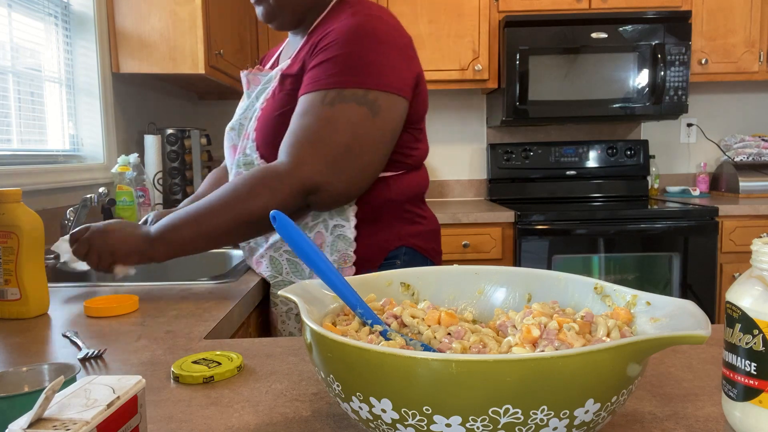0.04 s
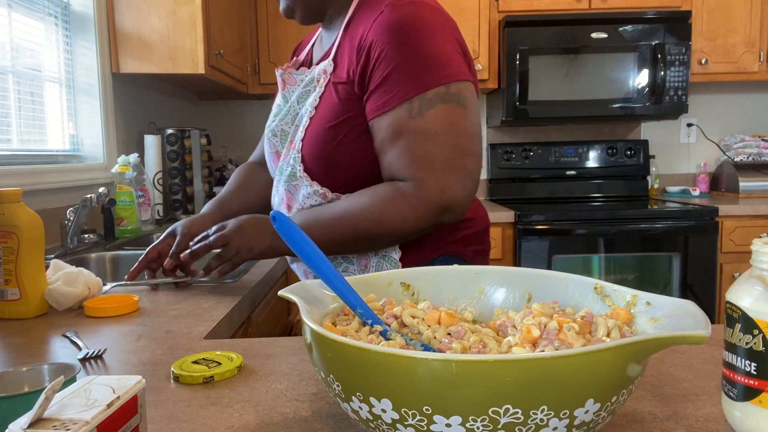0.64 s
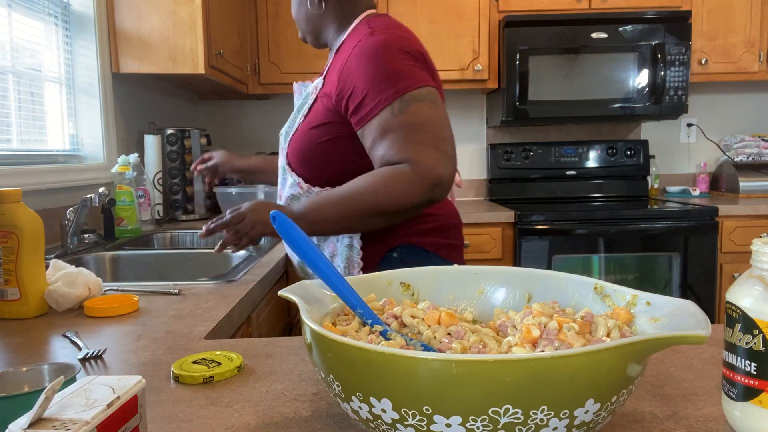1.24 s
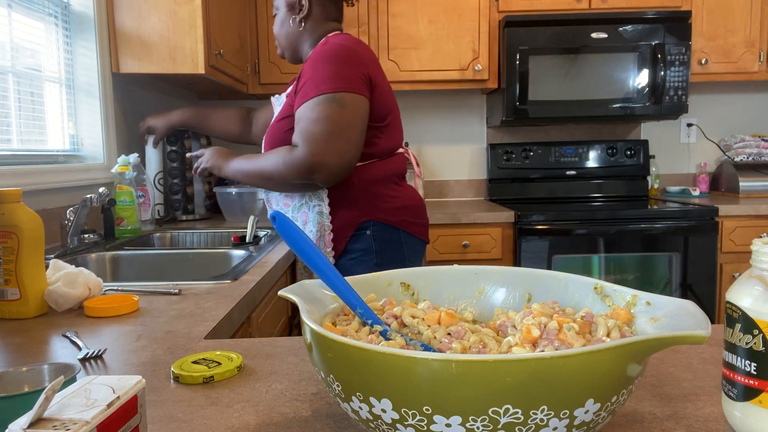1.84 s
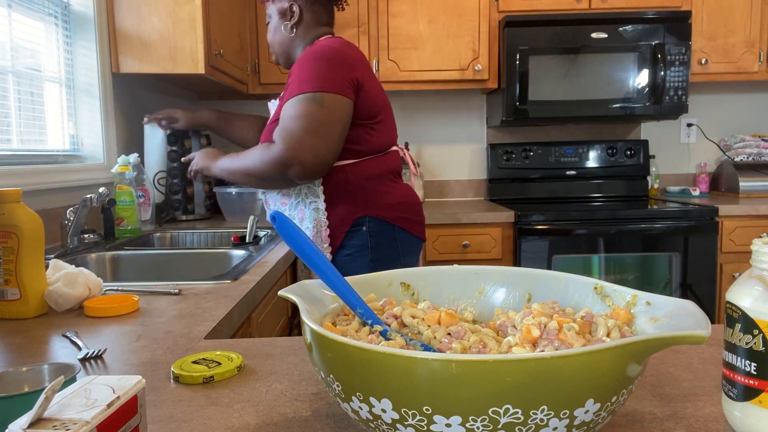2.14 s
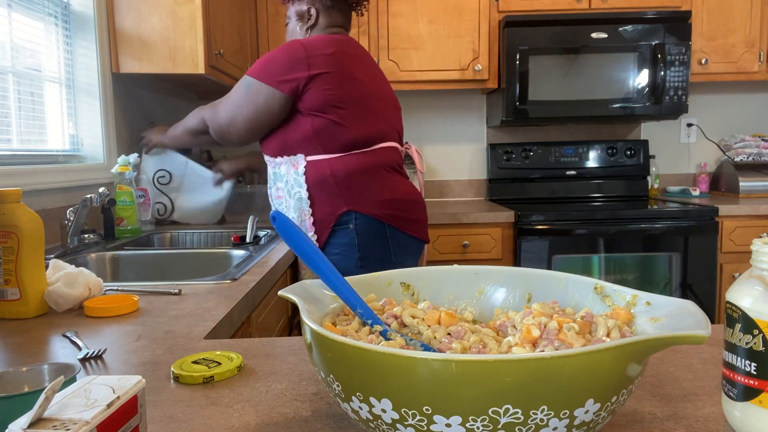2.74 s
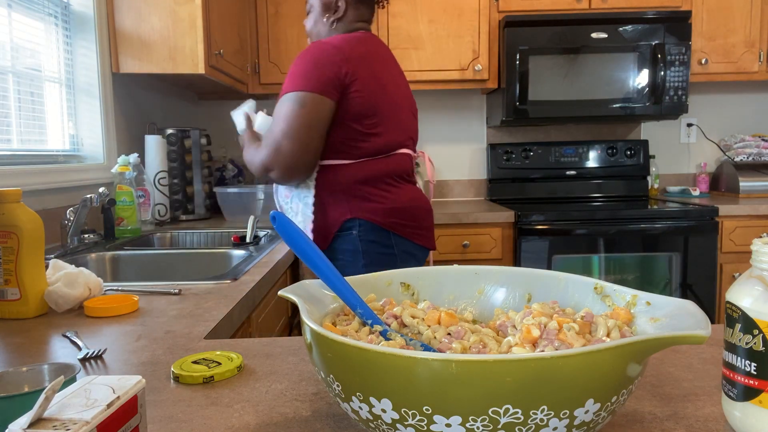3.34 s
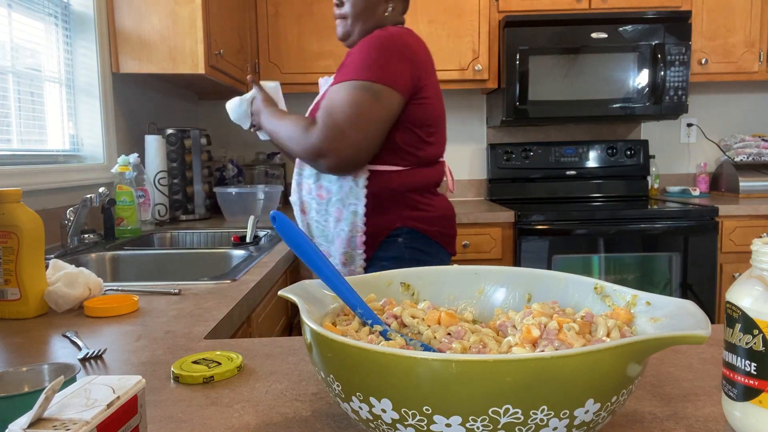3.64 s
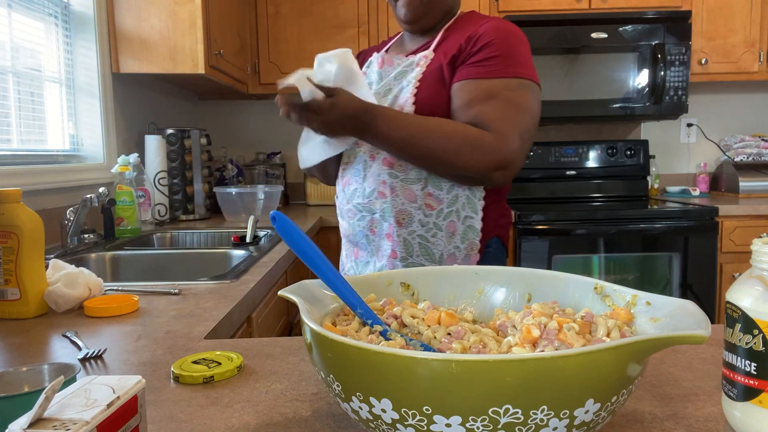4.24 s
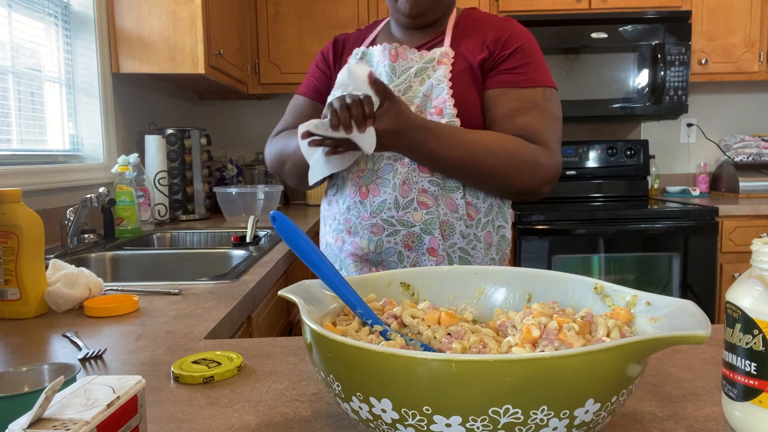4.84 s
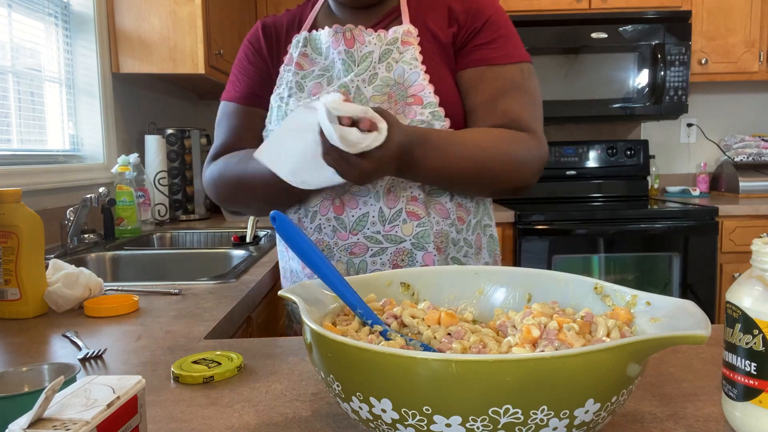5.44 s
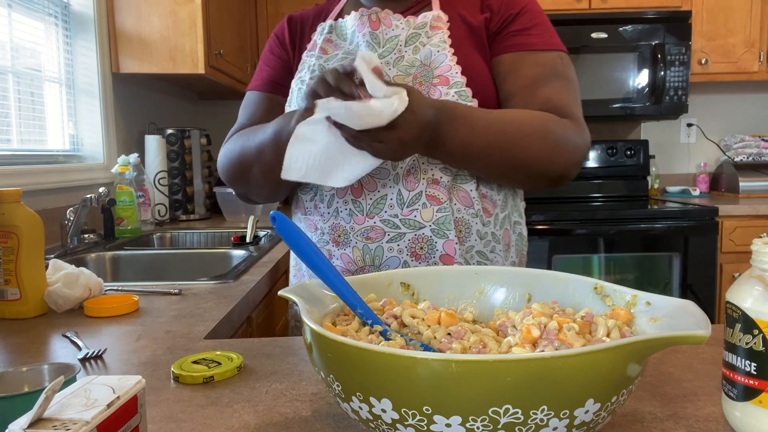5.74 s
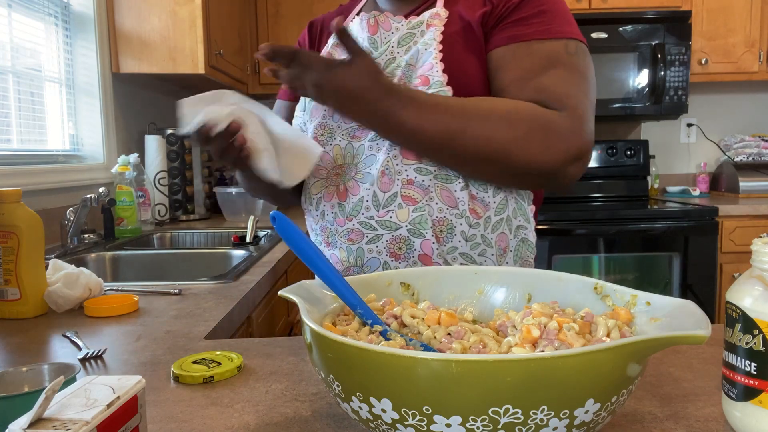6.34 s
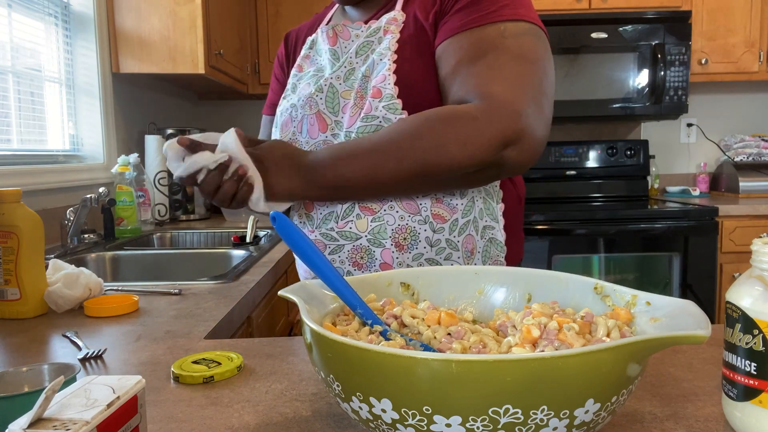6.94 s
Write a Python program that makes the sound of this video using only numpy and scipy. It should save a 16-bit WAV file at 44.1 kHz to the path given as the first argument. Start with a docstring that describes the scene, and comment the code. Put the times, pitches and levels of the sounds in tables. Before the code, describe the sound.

Two ringing knocks in a kitchen sink, followed by a paper towel roll rumbling, a quick rip and soft hand drying.

```python
"""A dull knock and a ringing clatter, just after a faint rustle of wet hands: a metal utensil is laid
down at a steel sink, thudding into the basin and ringing in its own modes. A paper towel roll rumbles
and hoots on its holder, the perforations of a sheet snap and the roll thumps back. Wet hands rub and
pat the sheet, making its fibres crackle. The kitchen is small and hard, with a low steady throb."""
import sys
import numpy as np
from scipy import signal
from scipy.fft import rfft, irfft, next_fast_len
from scipy.io import wavfile
from scipy.ndimage import uniform_filter1d, map_coordinates

SR = 44100
rng = np.random.default_rng(int(sys.argv[2]) if len(sys.argv) > 2 else 0)


def transcribe(u):
    """Save the signal u as a 16-bit wav file named by the first command-line argument.

    u: samples, shape (n,) or (channels, n), limited to [-1, 1]; the rate is SR.
    q: integer samples, one column per channel.
    """
    v = np.clip(np.atleast_2d(u).T, -1, 1)
    q = np.round(v * 32767).astype(np.int16)
    wavfile.write(sys.argv[1], SR, q)


N = 317895
TIME = np.arange(N) / SR

# utensil hits on the sink: t/s, thud/dB, contact brightness/Hz, clash/dB, ring/dB, tilt/(dB per octave)
SINK_HITS = [(0.4781, 5, 2450, -35, -63.5, 5), (0.4852, -17.5, 1440, -56.5, -64, -1),
             (0.4889, -11, 2170, -55.5, -71, 4), (0.5238, -17, 1900, -42.5, -64, 5),
             (0.7311, -8, 3800, -26, -38, -12), (0.7336, 2.5, 1490, -36, -46, 4),
             (0.7513, -4.5, 3200, -32.5, -40, 5.5), (0.7538, -2.5, 1480, -57, -53, -0.5),
             (0.777, -19, 3000, -36, -36, -5), (0.7965, -8.5, 2500, -35.5, -51, -5),
             (0.825, -14, 3000, -35.5, -38.5, -4)]
# EQ of the basin's thud and of the steel-on-steel clash: f/Hz, level/dB
THUD_EQ = [(40, -29.5), (70, -6), (120, -9), (250, -7.5), (430, 3), (800, -0.5), (1200, -1.5), (2000, -8.5),
           (3000, -30), (5000, -29), (15000, -17.5)]
CLASH_EQ = [(500, 0.5), (1500, 10), (2500, 6.5), (3400, 0), (4300, -2.5), (5700, -8.5), (7500, -17.5),
            (10000, -28.5), (12500, -52.5), (15500, -62.5)]
# resonances of the basin and of the utensil: f/Hz, level/dB, t60/s
BASIN_RING = [(68, -10.5, 0.68), (203.4, -4, 0.27), (262, -5.5, 0.43), (415, -1.5, 0.16), (669, -12, 0.11),
              (785, 2.5, 0.229), (1000, -18.5, 0.2), (1143, -6, 0.19), (1450, -17, 0.26),
              (1830, -13, 0.1426)]
UTENSIL_RING = [(2993, -16, .38), (3323, -11, .4), (4510, -13.5, .43), (4798, -1.5, .33), (6344, -11, .39),
                (7283, -19.5, .41), (9103, -29, .43), (9435, -21, .41), (10760, -18, .28),
                (12190, -32.5, .32), (13790, -41, .35), (15650, -51, .25)]

def sink():
    """Each hit thuds into the damped basin, scrapes steel on steel and sets the utensil ringing."""
    s, thud_db, bright_hz, clash_db, ring_db, tilt_db = np.transpose(SINK_HITS)
    thuds = np.zeros(N)
    for at, db, hz in zip(s, thud_db, bright_hz):
        add(thuds, at, amp(db) * pulse(THUD_EQ, hz, slope=7.7))
    # the steel sheet's many short modes thicken the thud
    body = scatter(thuds, [(200, 0.062), (4000, 0.024)], wet_db=-5.5, rise_s=0.00077)
    contact = sum(burst(at, db, dying_s=0.0097) for at, db in zip(s, clash_db))
    clash = contact * colour(rng.standard_normal(N), CLASH_EQ)
    basin = amp(-38.5) * ring(BASIN_RING, np.c_[s, thud_db, np.zeros_like(s)], waver=0.44)
    utensil = ring(UTENSIL_RING, np.c_[s, ring_db, tilt_db], waver=0.33)
    impact = room(body, wet_db=-2) + room(clash, wet_db=0)
    return impact + room(basin, wet_db=-6) + room(utensil, wet_db=-8)


# knocks of the roll on its holder: t/s, level/dB, contact brightness/Hz, holder ring/dB
ROLL_KNOCKS = [(2.1513, -22.5, 3800, -51), (2.176, -25, 1800, -46), (2.199, -15, 1410, -48),
               (2.238, -18.5, 900, -65), (2.380, -25, 900, -56), (2.992, -24, 1400, -36.5),
               (3.003, -16.5, 1200, -34.5), (3.031, -16, 900, -57), (3.049, -25, 1094, -51),
               (3.081, -14, 786, -51), (3.116, -28, 920, -45.5)]
# tugs that spin the roll: peak t/s, length/s, rumble/dB
ROLL_TUGS = [(1.899, 0.077, -58), (2.175, 0.094, -45), (2.392, 0.092, -56.5), (2.534, 0.081, -53),
             (2.672, 0.11, -57.5), (2.794, 0.097, -48), (3.009, 0.084, -41)]
# EQ of the hollow roll: f/Hz, level/dB
ROLL_EQ = [(60, -9), (105, -10), (150, -4), (210, 1), (280, -2), (380, -1), (480, -7), (720, -6),
           (1100, -15), (1700, -23), (4000, -45), (8000, -68)]
# resonances of the holder: f/Hz, level/dB, t60/s
HOLDER_RING = [(210, -6, 0.2), (596, -13, .12), (730, 2, 0.063), (1147, -10, 0.044)]

def roll():
    """The cardboard core rumbles round its post at each tug, and knocks against the holder."""
    knocks = np.zeros(N)
    for s, db, bright_hz, _ in ROLL_KNOCKS:
        add(knocks, s, amp(db) * pulse(ROLL_EQ, bright_hz, slope=3))
    holder = ring(HOLDER_RING, [(s, ring_db, 0) for s, _, _, ring_db in ROLL_KNOCKS], waver=0.23)
    # the roll speeds up quickly, then coasts
    spin = sum(amp(db) * swell(s, length_s, rise=0.22) for s, length_s, db in ROLL_TUGS)
    soft_contact = signal.butter(1, 1100, fs=SR)
    bumps = signal.lfilter(*soft_contact, grains(per_s=600, spread_db=0.5))
    rumble = spin * colour(bumps, ROLL_EQ)
    return room(knocks + rumble, wet_db=-0.5) + room(holder, wet_db=-19)


# slips of the core on its post: peak t/s, length/s, level/dB, f/Hz
CORE_SLIPS = [(2.391, .03, -47, 579), (2.853, .02, -37.5, 505), (2.877, .015, -30.5, 540),
              (2.925, .024, -41.5, 535)]

def judder(glide_hz_per_s=500):
    """The core sticks and slips on its post; each slip is a short, rough, rising hoot."""
    hoots = np.zeros(N)
    roughness = 1 + 0.0247 * drift(rate=280)
    for s, length_s, db, hz in CORE_SLIPS:
        pitch = hz + glide_hz_per_s * np.clip(TIME - s, -length_s, length_s)
        phase = 2 * np.pi * np.cumsum(pitch * roughness) / SR
        tone = np.sin(phase) + amp(-18.5) * np.sin(2 * phase)
        hoots += amp(db) * swell(s, length_s, rise=0.78) * tone
    return room(hoots, wet_db=-7)


# EQ of the rip: f/Hz, level/dB
TEAR_EQ = [(60, 5), (150, -7), (274, -1.5), (370, -17), (600, -0.5), (1100, -4), (1800, -6), (2300, -13),
           (3500, -16), (4900, -17.5), (8000, -27.5), (13000, -37), (15500, -47)]

def tear(start_s=2.781, length_s=0.093, attack_s=0.0045, release_s=0.018, sag_db_per_s=38):
    """Perforations snap in a quick run; the rip weakens as it goes, then lets go."""
    t = np.maximum(TIME - start_s, 0)
    attack = np.minimum(t / attack_s, 1)
    release = np.exp(-np.clip((t - length_s) / release_s, 0, 20))
    pull = attack * amp(-46 - sag_db_per_s * t) * release
    perforations = grains(per_s=2200, spread_db=3.3)
    return room(pull * colour(perforations, TEAR_EQ), wet_db=-0.5)


# pats and snaps of the sheet in the hands: t/s, level/dB, snap relative to level/dB, decay/s
HAND_PATS = [(2.323, -59.5, -3, 0.011), (2.371, -60.5, -1, 0.0086), (2.7841, -39.5, -3, 0.0012),
             (2.79, -39, -11, 0.0093), (3.073, -63, 1, 0.0053), (3.273, -57.5, -20, 0.0055),
             (3.305, -56.5, -6, 0.0066), (5.049, -61.5, -5.5, 0.0063), (5.3357, -54, -10.5, 0.0039),
             (5.875, -54, -13, 0.0072), (5.88, -49.5, -5, 0.0095), (6.436, -42.5, -18, 0.0031),
             (6.4382, -38.5, -4, 0.0026), (6.441, -48, -6.5, 0.0061)]
# EQ of the palm and of the snapping folds: f/Hz, level/dB
PALM_EQ = [(100, -12), (220, -2), (420, 1), (580, 5), (800, 0), (1450, -1), (2200, -8), (4000, -24),
           (9000, -45)]
SNAP_EQ = [(800, -15), (2100, 0), (3200, 3), (4900, -2), (8000, -7), (11000, -18), (15500, -27)]

def pats(slap_s=6.4383):
    """The palm gives a dull puff and the folds snap under it."""
    palm = sum(burst(s, db, dying_s) for s, db, _, dying_s in HAND_PATS)
    folds = sum(burst(s, db + snap_db, dying_s) for s, db, snap_db, dying_s in HAND_PATS)
    puff = palm * colour(rng.standard_normal(N), PALM_EQ)
    # the hardest pat lands flat and pushes the air out at once
    add(puff, slap_s, amp(-19) * pulse(PALM_EQ, bright_hz=3000, slope=1))
    snap = folds * colour(rng.standard_normal(N), SNAP_EQ)
    return room(puff, wet_db=-6.5) + room(snap, wet_db=-2.5)


# wet hands move, reach for the roll, unroll it, gather the sheet and dry themselves:
# peak t/s, length/s, rustle/dB, crinkle relative to rustle/dB, rub relative to rustle/dB
HAND_STROKES = [(0.075, 0.25, -74, -6.5, 5.5), (0.245, 0.078, -79.5, -8, 6), (1.235, .12, -91, -8, 19),
                (1.594, 0.27, -75, -5, 6), (1.843, 0.38, -75.5, -9, 0), (2.087, 0.096, -78.5, 0, 10),
                (2.169, 0.044, -75, -16, 21.5), (2.24, 0.14, -72, -4, -1), (2.352, 0.16, -71.5, -10, 4.5),
                (2.514, 0.13, -74, -8, 1), (2.754, 0.28, -70, -8, 5), (3.314, 0.17, -72, -10, 7),
                (3.474, 0.17, -72, -8, 5), (3.646, 0.2, -76, -4.5, -1.5), (3.873, 0.16, -77, -7, 3),
                (4.03, 0.063, -81, -11, 5.5), (4.16, 0.38, -81.5, -11.5, 8.5),
                (4.556, 0.19, -76.5, -11, 6.5), (4.805, 0.25, -75.5, -6.5, 2), (5.047, 0.089, -75, -9, -2),
                (5.151, 0.09, -73.5, -6, -2), (5.252, 0.17, -76, -12, 5.5), (5.476, 0.16, -70.5, -8, -6),
                (5.717, 0.17, -75.5, -7, 3.5), (5.989, 0.17, -73, -11, 2), (6.193, 0.13, -72.5, -4, -2),
                (6.829, 0.17, -70, -7.5, 0), (6.996, 0.15, -79, -4, 1.5), (7.19, .08, -76, -1.5, -3)]
# EQ of the paper's rustle, its crisp creases and the rubbing skin: f/Hz, level/dB
RUSTLE_EQ = [(700, -20.5), (1600, 0.5), (2600, 1), (3500, -0.5), (4900, 0.5), (6500, -15.5), (9000, -14.5),
             (15000, -37)]
CRINKLE_EQ = [(3000, -17.5), (6000, -0.5), (8000, -2.5), (11000, -12), (15500, -16.5)]
RUB_EQ = [(150, -5), (350, 3), (700, 0.5), (1400, -1.5), (2500, -16.5), (5000, -33), (12000, -55)]

def towel():
    """At each stroke fibres crackle in clumps, finer where the sheet creases, over the rub of skin."""
    rustle, crinkle, rub = np.zeros((3, N))
    for s, length_s, db, crinkle_db, rub_db in HAND_STROKES:
        stroke = amp(db) * swell(s, length_s, rise=0.48)
        rustle += stroke
        crinkle += amp(crinkle_db) * stroke
        rub += amp(rub_db) * stroke
    rustle *= colour(grains(per_s=5000, spread_db=1.5), RUSTLE_EQ)
    crinkle *= colour(grains(per_s=1700, spread_db=0.5), CRINKLE_EQ)
    rub *= colour(grains(per_s=2500, spread_db=3), RUB_EQ)
    clumps = amp(1.06 * drift(rate=60))
    return room((rustle + crinkle) * clumps + rub, wet_db=-3.5)


# EQ of the room's air, and the tones of its hum: f/Hz, level/dB
AIR_EQ = [(8, -12.5), (24, -6.5), (40, -10), (64, -18), (119, -21.5), (157, -22.5), (260, -28.5),
          (450, -32), (686, -36), (1000, -40), (2210, -48), (3400, -49), (4800, -50), (9000, -62.5),
          (15500, -67.5)]
HUM_TONES = [(65, -72.5), (73.5, -65), (82, -70), (111, -80), (147, -69.5), (210, -76.5), (329, -84)]

def room_tone(throb_hz=16.1):
    """A bed of air with a very low throb and a wavering hum."""
    air = amp(-56) * colour(rng.standard_normal(N), AIR_EQ)
    throb = amp(-46.5) * np.sin(2 * np.pi * throb_hz * TIME)
    hum = np.zeros(N)
    for hz, db in HUM_TONES:
        phase = 2 * np.pi * (hz * TIME + rng.random())
        hum += amp(db) * np.sin(phase + 0.002 * hz * drift(rate=4.4))
    flutter = amp(3 * drift(rate=6.9))
    return air + np.sqrt(2) * (throb + hum * flutter)


# reverb time of the kitchen: f/Hz, t60/s
KITCHEN_DECAY = [(100, 0.59), (300, 0.61), (1000, 0.53), (3000, 0.47), (6000, 0.57), (14000, 0.38)]

def room(x, wet_db):
    """Close, hard walls add a short, bright reverb."""
    return scatter(x, KITCHEN_DECAY, wet_db, rise_s=0.0019)


def scatter(x, t60s, wet_db, rise_s):
    """Adds a diffuse tail of random echoes, each band dying at its own speed."""
    slots = np.arange(0, SR - 12, 12)
    taps = np.zeros(SR)
    taps[slots + rng.integers(0, 12, len(slots))] = rng.choice([-1., 1.], len(slots))
    hz, t, bands = signal.stft(taps, SR, nperseg=256)
    decay = amp(-60 * t / read(t60s, hz)[:, None])
    _, tail = signal.istft(bands * decay, SR, nperseg=256)
    tail *= 1 - np.exp(-np.arange(len(tail)) / SR / rise_s)
    return x + amp(wet_db) * signal.fftconvolve(x, tail / np.linalg.norm(tail))[:N]


def ring(modes, strikes, waver):
    """Strikes (t/s, level/dB, tilt/(dB per octave)) feed modes that waver as the object rocks."""
    s, strike_db, tilt_db = np.transpose(strikes)
    live = slice(round(s.min() * SR) - 100, round(s.max() * SR) + SR)
    t, out = TIME[live], np.zeros(N)
    for hz, db, t60 in modes:
        fed = np.zeros(len(t))
        fed[np.searchsorted(t, s)] = amp(db + strike_db + tilt_db * np.log2(hz / 5000)) ** 2
        energy = signal.lfilter([1], [1, -amp(-120 / (t60 * SR))], fed)
        envelope = uniform_filter1d(np.sqrt(energy), size=60)
        tremolo, sway = (map_coordinates(row, [t * 45], mode="wrap")
                         for row in rng.standard_normal((2, 1024)))
        out[live] += envelope * np.exp(waver * tremolo) * np.sin(2 * np.pi * hz * t + 2 * waver * sway)
    return out


def pulse(eq, bright_hz, slope, size=4096):
    """One hit with a body's EQ; soft contact rolls off the treble."""
    hz = abs(np.fft.fftfreq(size, 1 / SR))
    gain = unit(amp(read(eq, hz))) / np.sqrt(1 + (hz / bright_hz) ** slope)
    minimum_phase = np.exp(np.conj(signal.hilbert(np.log(gain + 1e-5))))
    return np.fft.ifft(minimum_phase).real[:size // 2]


def burst(s, db, dying_s):
    """Envelope of a sudden contact that dies away."""
    envelope = np.zeros(N)
    add(envelope, s, amp(db) * np.exp(-TIME[:SR // 4] / dying_s))
    return envelope


def swell(s, length_s, rise):
    """Envelope of a move that builds for the share rise of its length, peaks at s and eases off."""
    span_s = length_s * np.where(TIME < s, rise, 1 - rise)
    return np.exp(-np.minimum(((TIME - s) / span_s) ** 2, 20))


def grains(per_s, spread_db):
    """Random tiny clicks of uneven size."""
    size = amp(spread_db * np.minimum(rng.exponential(1, N), 4))
    return unit(size * rng.choice([-1, 1], N) * (rng.random(N) < per_s / SR))


def drift(rate):
    """Smooth random modulation of rms 1, with about rate turns a second."""
    return unit(map_coordinates(rng.standard_normal(4096), [TIME * rate], mode="wrap"))


def colour(x, eq):
    """Runs x through an EQ curve, at rms 1."""
    size = next_fast_len(N)
    gain = amp(read(eq, np.fft.rfftfreq(size, 1 / SR)))
    return unit(irfft(rfft(x, size) * gain, size)[:N])


def read(points, hz):
    """Reads a table on a log-frequency axis."""
    f, value = np.transpose(points)
    return np.interp(np.log(hz + 1), np.log(f + 1), value)


def add(mix, s, sound):
    """Mixes a sound in at time s."""
    part = mix[round(s * SR):][:len(sound)]
    part += sound[:len(part)]


def amp(db):
    """Decibels to gain."""
    return 10 ** (np.asarray(db) / 20)


def unit(x):
    """Scales to rms 1."""
    return x / np.sqrt(np.mean(x ** 2) + 1e-20)


def scene():
    """The mono mix of all sources."""
    return (sink() + roll() + tear() + judder() + towel() + pats() + room_tone())[None]


def record(dry):
    """A steep high cut takes off the very top."""
    high_cut = signal.firwin(511, 15750, window=("kaiser", 9), fs=SR)
    return signal.oaconvolve(dry, high_cut[None], "same")


dry = scene()
out = record(dry)
transcribe(out)
```